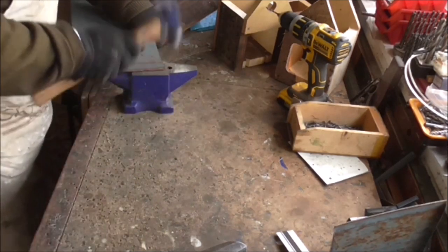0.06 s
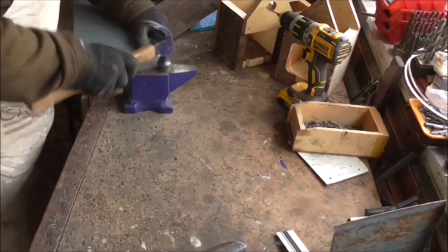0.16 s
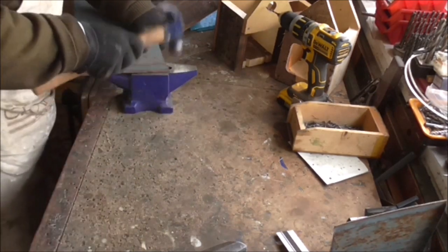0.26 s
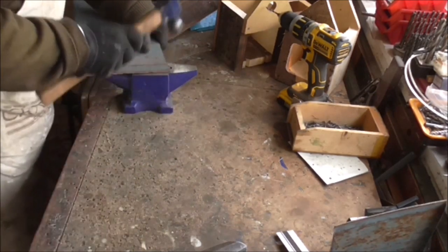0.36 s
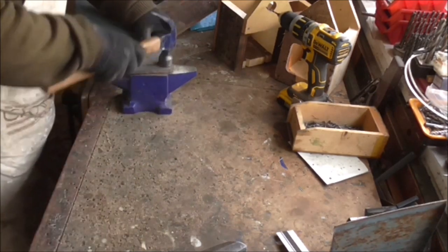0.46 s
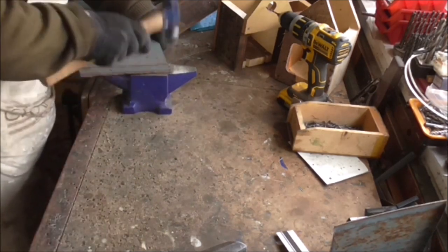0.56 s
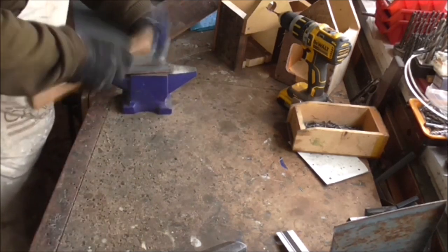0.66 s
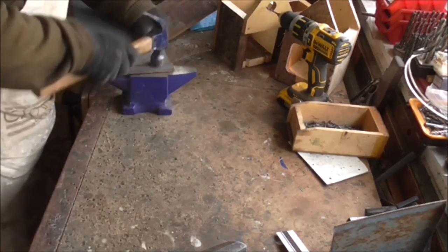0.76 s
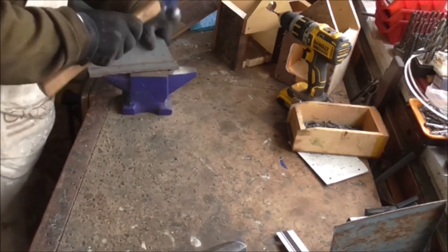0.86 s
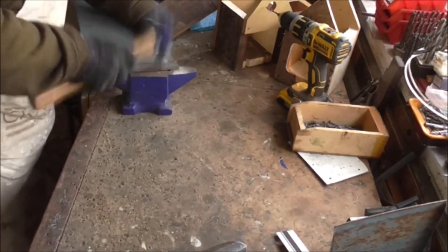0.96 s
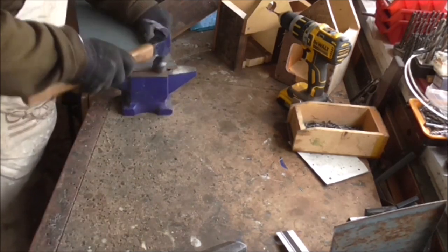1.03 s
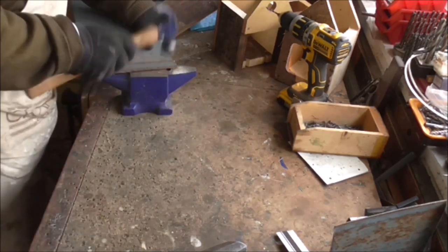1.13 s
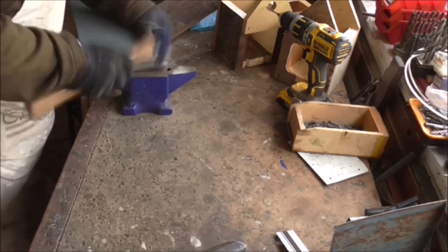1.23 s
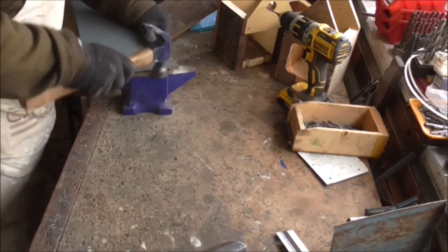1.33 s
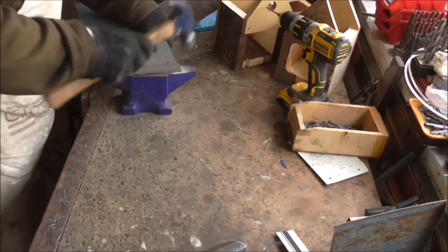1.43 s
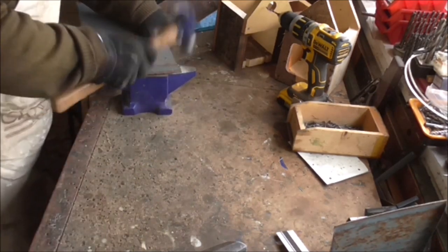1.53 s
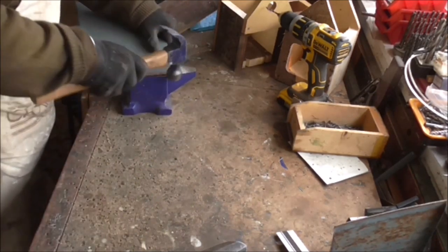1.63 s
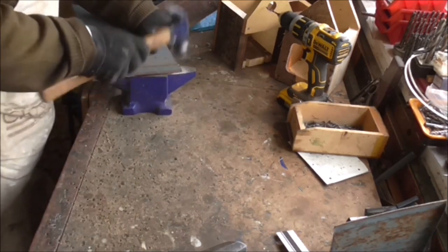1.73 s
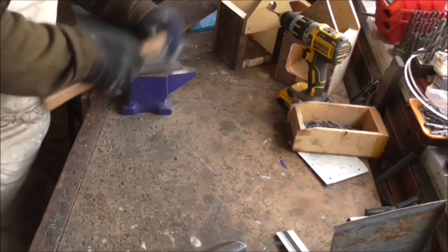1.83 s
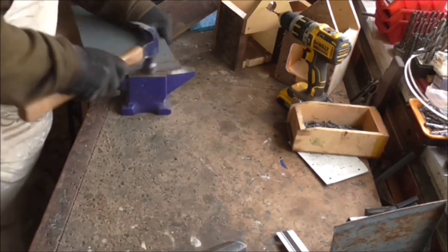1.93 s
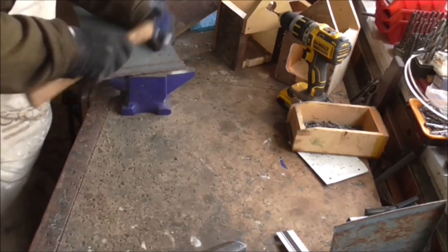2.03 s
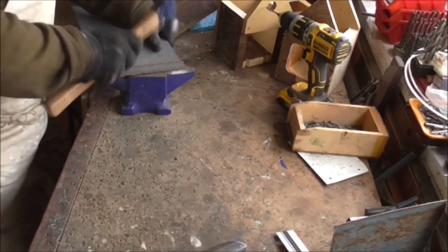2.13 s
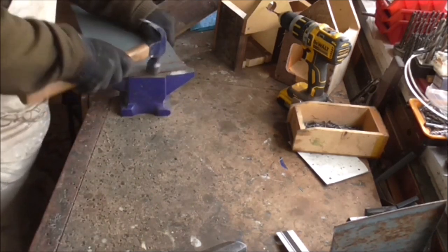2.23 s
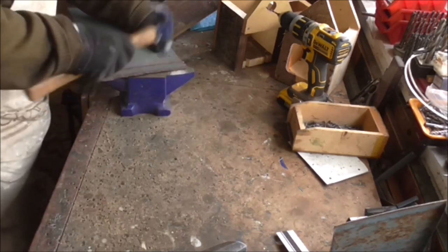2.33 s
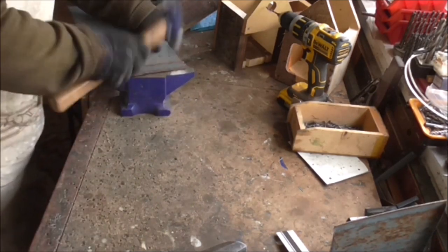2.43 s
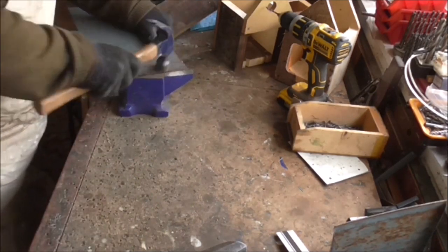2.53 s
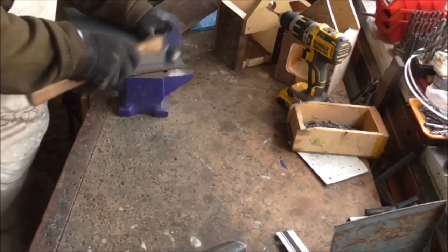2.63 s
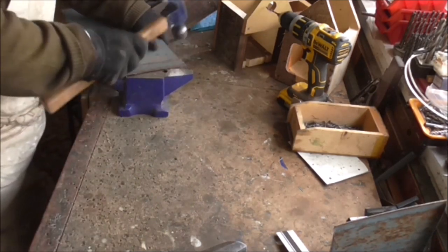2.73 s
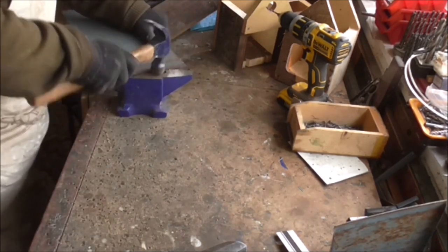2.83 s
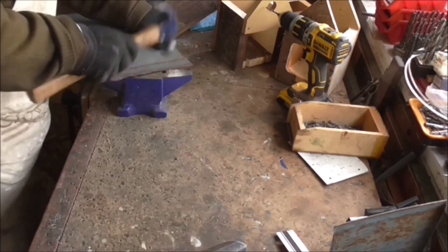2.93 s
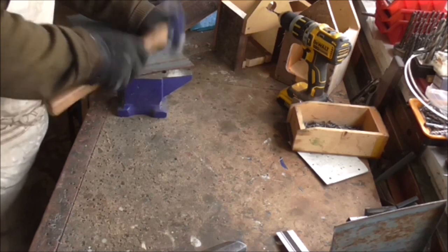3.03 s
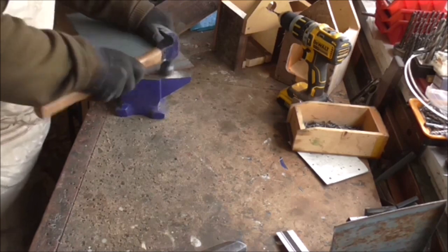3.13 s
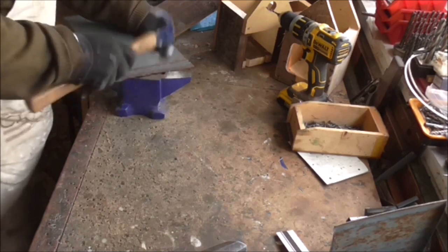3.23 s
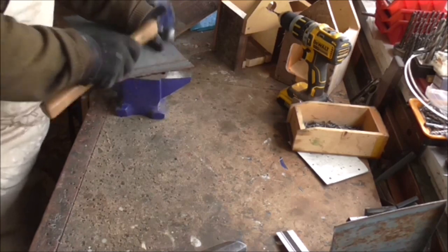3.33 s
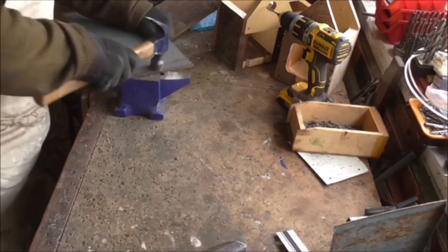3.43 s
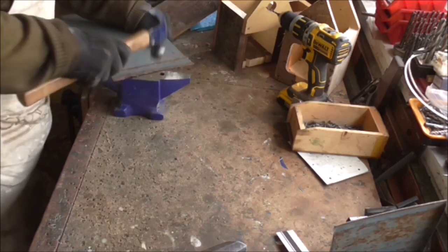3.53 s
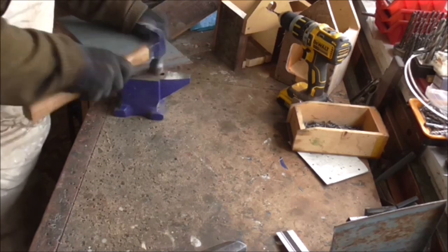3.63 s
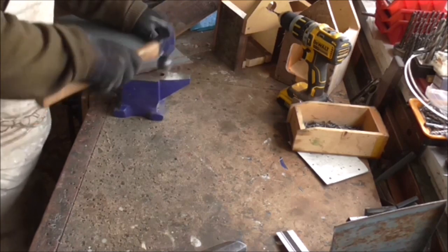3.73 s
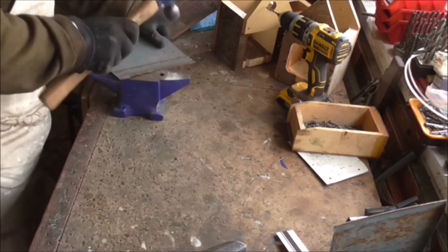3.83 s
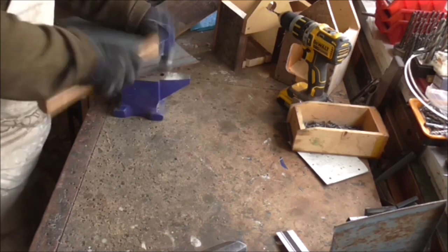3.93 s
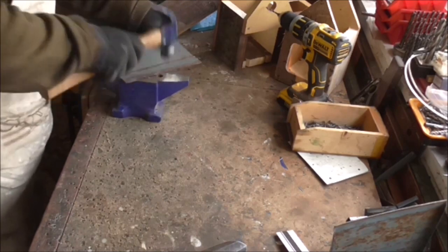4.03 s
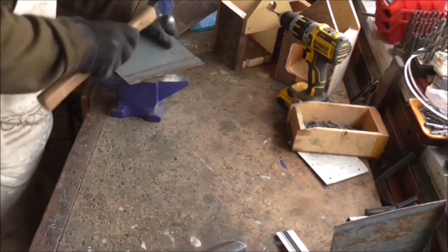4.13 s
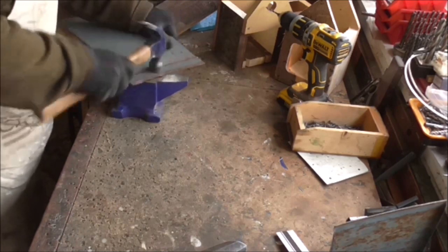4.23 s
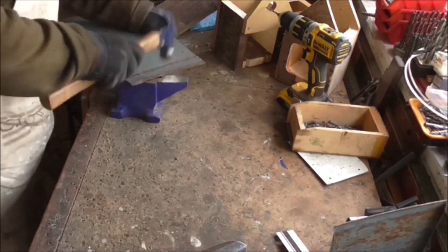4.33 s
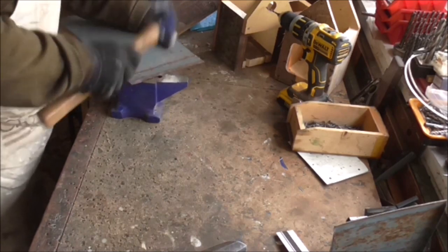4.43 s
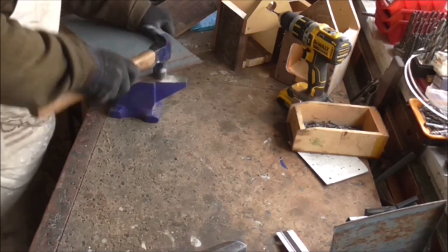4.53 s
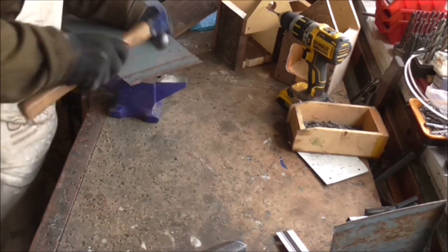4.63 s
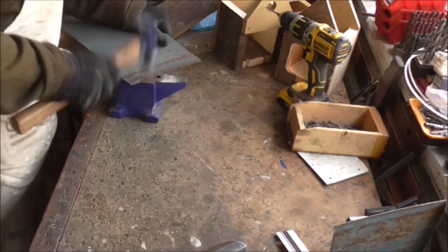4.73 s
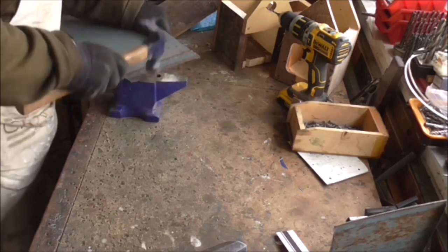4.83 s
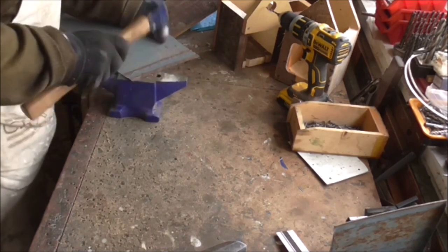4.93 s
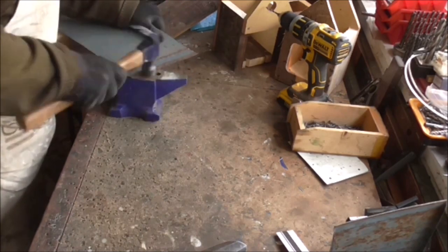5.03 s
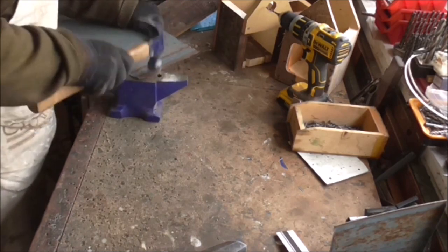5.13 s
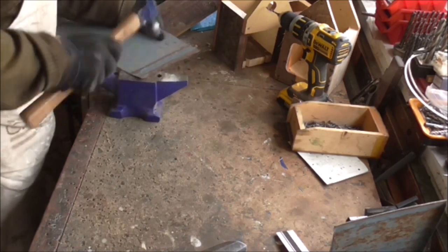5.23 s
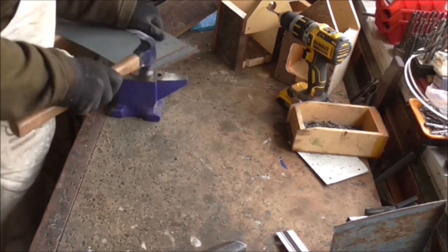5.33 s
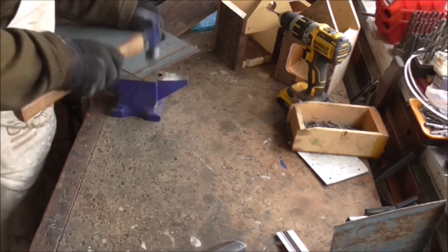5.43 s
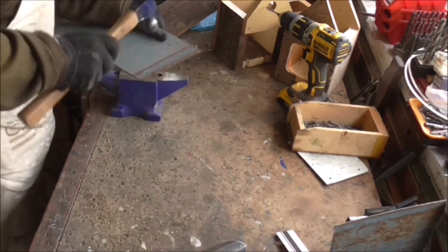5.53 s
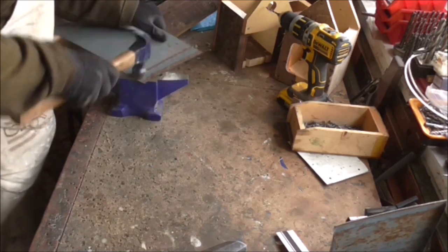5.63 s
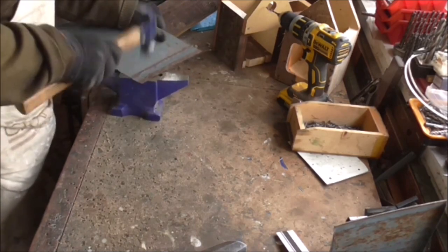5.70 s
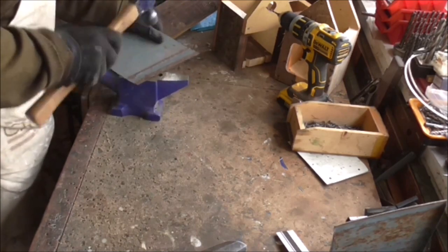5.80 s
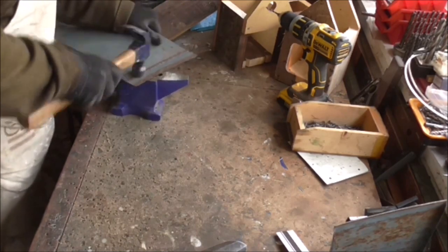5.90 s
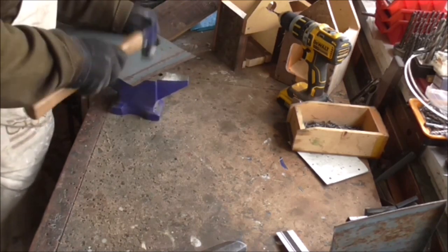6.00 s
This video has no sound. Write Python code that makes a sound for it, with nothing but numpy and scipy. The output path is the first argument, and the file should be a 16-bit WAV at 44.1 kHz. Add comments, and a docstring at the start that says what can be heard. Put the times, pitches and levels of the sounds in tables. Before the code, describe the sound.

A hammer strikes sheet metal on a small anvil in steady, sharp, briefly ringing blows in a small workshop.

```python
"""Sharp, ringing hammer blows, between three and four a second, sound in a small workshop.
A claw hammer is flattening a steel sheet, held in a gloved hand, on a small anvil on a wooden bench.
Each blow cracks, rings the steel briefly and thumps the bench; the room echoes.
Between some blows the hand shifts the sheet with a faint scrape.
A limiter, an automatic volume control, holds the blows at much the same level."""
import sys
import numpy as np
from scipy import signal
from scipy.fft import rfft, irfft, next_fast_len
from scipy.io import wavfile
from scipy.ndimage import uniform_filter1d, minimum_filter1d

SR = 44100
rng = np.random.default_rng(int(sys.argv[2]) if len(sys.argv) > 2 else 0)


def int16_out(signal):
    """Quantize to a 16-bit WAV file."""
    q = np.round(np.clip(np.atleast_2d(signal).T, -1, 1) * 32767)
    wavfile.write(sys.argv[1], SR, q.astype(np.int16))


N = 267378
T = np.arange(SR // 2) / SR  # seconds within one blow or scrape

# The hammer blows; how squarely the face lands decides the two rings.
# Each row: time in seconds, strength in dB, anvil ring in dB, hammer head ring in dB.
BLOW_EVENTS = [(-0.088, -10, -28.5, -47), (0.213, -11.5, -31, -41), (0.509, -9.5, -27.5, -29),
               (0.795, -8, -30, -32), (1.076, -9.5, -28.5, -39.5), (1.354, -10, -28.5, -34),
               (1.653, -11.5, -38.5, -28.5), (1.961, -10.5, -30.5, -38), (2.267, -10, -35.5, -30.5),
               (2.568, -10, -34.5, -33.5), (2.882, -13, -31.5, -44), (3.17, -11.5, -35, -31.5),
               (3.464, -12.5, -31, -37), (3.747, -14.5, -38, -38), (4.033, -10.5, -32.5, -26.5),
               (4.307, -11.5, -28, -46), (4.581, -11.5, -35.5, -40.5), (4.843, -14, -40, -38),
               (5.129, -10, -32, -26.5), (5.406, -12.5, -40.5, -31.5), (5.695, -11, -30.5, -28.5),
               (5.981, -10.5, -32.5, -31)]
# The hand shifts the sheet. Each row: start in seconds, scrape level in dB, length in seconds.
SHEET_SHIFTS = [(0.362, -70, 0.093), (1.593, -70, 0.069), (1.897, -67, 0.18), (2.086, -50, 0.06),
                (2.683, -66.5, 0.042), (3.073, -70.5, 0.045), (3.901, -77, 0.22), (4.972, -67, .06)]
# The sheet is fed across the anvil. Each row: time in seconds, pitch of the struck spot in Hz.
SPOT_PITCH = [(0, 4885), (2, 4870), (4.55, 4862), (4.85, 4925), (6, 4935)]
# The further the sheet sticks out, the looser it sounds.
# Each row: time in seconds, ring of the free end in dB, clank in dB (both added to the blow's strength).
SHEET_LOOSENESS = [(0, -39, -22), (1.96, -33, -19.5), (3.17, -25.5, -17.5), (4.4, -23, -16.5),
                   (5.13, -29.5, -22.5), (6, -26, -21.5)]

# Modes are the tones a struck thing rings with.
# Each row: pitch in Hz, relative level in dB, seconds to fade by 60 dB (called t60).
ANVIL_MODES = [(3887, -.5, .14), (4282, 2, .125), (5870, -8.5, .11), (6100, -10, .08), (7069, -17, .12),
               (8620, -21, .1)]
HAMMER_MODES = [(5472, 0, .12), (7890, -6, .085)]
SHEET_MODES = [(4880, 0, .14), (4945, -4, .14), (4825, -5, .13), (4745, -5.5, .12), (4640, -5, .1),
               (5150, -12, .06)]  # around the struck spot, strongest first
OVERHANG_MODES = [(676, 1, 0.27), (606, -2, 0.29), (687, -3, 0.15)]  # the sheet's free end bending
BENCH_MODES = [(116, -13, 0.42), (182, -4, 0.11), (206, -2, 0.18), (218.7, 2.5, 0.24), (281.3, -1.5, 0.33),
               (413, -6, 0.17), (490, -9.5, 0.084), (549.5, 1.5, 0.16), (1135, -8, 0.29), (1583, -3, 0.13),
               (1706, 2, 0.087)]

# The tone colour of each noise. Each row: frequency in Hz, relative level in dB.
AIR_SPECTRUM = [(15, -53), (25, -5.5), (236, 1), (285, 0), (463, -0.5), (734, -14.5), (840, -8),
                (3160, -15.5), (3820, -23.5), (4870, -14), (6380, -20), (13600, -33.5), (16000, -63)]
ECHO_SPECTRUM = [(100, -3.5), (400, 7.5), (1500, -0.5), (4500, -0.5), (9000, 4), (15000, -2.5)]
SCRAPE_SPECTRUM = [(100, -7.5), (300, -1.5), (700, 5.5), (1100, -1.5), (1900, 0.5), (3200, -15.5),
                   (4900, -5), (8000, -17.5), (15000, -36)]
THUMP_SPECTRUM = [(25, -28), (55, -16.5), (85, -12.5), (120, -5.5), (180, -3), (240, -3.5), (330, -4.5),
                  (700, -17), (2000, -45.5)]
CLANK_SPECTRUM = [(100, -23.5), (250, -5.5), (450, -1), (680, 2.5), (900, -3), (1700, -8), (3000, -17),
                  (6000, -41)]
SIZZLE_SPECTRUM = [(1000, -14), (3500, -3), (3880, 9.5), (4080, 4.5), (4290, 11), (4470, 5), (4850, 14),
                   (5250, 4.5), (5480, 9), (6000, 4.5), (6700, -1), (9500, -8), (12500, -9.5), (15400, -7),
                   (16200, -23.5)]
CRACK_SPECTRUM = [(100, -18), (400, -3), (1300, 4.5), (2000, 1), (2700, 5), (3500, -3), (4900, 9),
                  (6500, -3), (9000, -5.5), (14000, -2.5), (15500, -7), (16200, -23)]

# How long the workshop echoes. Each row: frequency in Hz, seconds to fade by 60 dB.
ECHO_T60 = [(100, 0.35), (400, 0.1734), (750, 0.29), (1200, 0.3), (2900, 0.2569), (5000, 0.2545),
            (9000, 0.2263), (12000, 0.2), (16000, 0.09)]
# How alike scattered sound is left and right. Each row: frequency in Hz, likeness (1 means the same).
STEREO_LIKENESS = [(30, .05), (100, .6), (300, .4), (700, .5), (1300, .25), (3000, .5), (4700, .72),
                   (8000, .35), (15000, .3)]


def amp(db):
    """Turn decibels into a number to multiply by."""
    return 10 ** (np.asarray(db) / 20)


def unit(x):
    """Scale a sound to an average level (rms) of 1."""
    return x / np.sqrt(np.mean(x ** 2) + 1e-20)


def unit_ring(x, seconds=0.026):
    """Give a whole ring the energy of a level-1 sound lasting this many seconds."""
    return x / np.sqrt(np.sum(x ** 2) / (len(x) * seconds * SR))


def at_hz(table, hz):
    """Read a table between its frequencies, with octaves evenly spaced."""
    frequencies, values = np.transpose(table)
    return np.interp(np.log(hz + 1), np.log(frequencies), values)


def at_time(table, s):
    """Read a table's values at s seconds."""
    times, *columns = np.transpose(table)
    return [np.interp(s, times, column) for column in columns]


def add(track, s, sound):
    """Mix a stereo sound into the track at s seconds."""
    start = round(s * SR)
    part = sound[:, max(-start, 0):max(N - start, 0)]
    track[:, max(start, 0):][:, :part.shape[1]] += part


def noise(spectrum, size=len(T), spread=1):
    """Stereo noise with a given tone colour; a small spread draws it to the centre."""
    hz = np.fft.rfftfreq(size, 1 / SR)
    angle = spread * np.arccos(np.clip(at_hz(STEREO_LIKENESS, hz), -1, 1)) / 2
    coloured = rfft(rng.standard_normal((2, size))) * amp(at_hz(spectrum, hz))
    mid, side = irfft(coloured * [np.cos(angle), np.sin(angle)], size)
    return unit(np.array([mid + side, mid - side]))


def fade(t60, rise):
    """The level of a struck thing: a quick rise, then a steady fall. Both times are in seconds."""
    return np.exp(-np.log(1000) * T / t60) * (1 - np.exp(-T / rise))


def ring(modes, scatter_db, detune, rise, width, stretch=1, linger=0):
    """Tones started by one blow; their level and tuning vary, as no two blows hit the same spot."""
    sound = np.zeros((2, len(T)))
    for hz, db, t60 in modes:
        level_luck, pitch_luck, phase_luck = rng.standard_normal(3)
        pitch = hz * stretch * (1 + detune * pitch_luck)
        phase = width * phase_luck * np.array([[1], [-1]])  # left and right are out of step
        envelope = fade(t60, rise) + linger * fade(2.8 * t60, rise)  # linger adds a longer tail
        sound += amp(db + scatter_db * level_luck) * envelope * np.sin(2 * np.pi * pitch * T + phase)
    return sound


def workshop(sound, echo_db, build_s):
    """Add the echo from bench top, clutter and walls; the highest treble dies first."""
    hz, t, bands = signal.stft(noise(ECHO_SPECTRUM), SR, nperseg=256)
    decay = np.exp(-np.log(1000) * t / at_hz(ECHO_T60, hz)[:, None])
    tail = signal.istft(bands * decay, SR, nperseg=256)[1][:, :len(T)]
    tail *= 1 - np.exp(-(T / build_s) ** 2)
    echo = signal.fftconvolve(sound.mean(0)[None], tail, axes=1)[:, :len(T)]
    return sound + amp(echo_db) * np.std(sound) * unit(echo)


def still_air():
    """The faint, steady hush of the workshop."""
    return amp(-74) * noise(AIR_SPECTRUM, next_fast_len(N))[:, :N]


def sliding():
    """Short gritty scrapes as the hand moves the sheet, whose edge hisses."""
    track = np.zeros((2, N))
    for s, scrape_db, length in SHEET_SHIFTS:
        stroke = np.sin(np.pi * np.minimum(T / length, 1))
        roughness = unit(uniform_filter1d(rng.standard_normal(len(T)), size=120))
        grit = unit(amp(2 * roughness))
        scrape = amp(scrape_db) * noise(SCRAPE_SPECTRUM)
        edge_hiss = amp(-72) * noise(SIZZLE_SPECTRUM)
        add(track, s, workshop(stroke * grit * (scrape + edge_hiss), echo_db=-8, build_s=0.005))
    return track


def clank_and_thump(overhang_db, clank_db):
    """A blow's dull part: the held sheet clanks, its free end rings hollow, the bench swings after."""
    clank = amp(clank_db) * fade(t60=0.23, rise=0.00015) * noise(CLANK_SPECTRUM)
    hollow = amp(overhang_db) * ring(OVERHANG_MODES, scatter_db=2.5, detune=.0064, rise=.0022, width=.4)
    thump = amp(-23.5) * fade(t60=0.26, rise=0.0037) * noise(THUMP_SPECTRUM)
    boards = amp(-27.5) * ring(BENCH_MODES, scatter_db=1, detune=.0066, rise=.0025, width=.13)
    lean_right = amp([[-.8], [.8]])
    return workshop(clank + hollow + thump + boards, echo_db=-13, build_s=0.033) * lean_right


def steel_ring(hammer_db, anvil_db, sheet_db, sheet_hz):
    """Anvil, hammer head and sheet ring clearly; anvil and head sing on faintly afterwards."""
    linger = amp(-24.5)
    anvil = ring(ANVIL_MODES, scatter_db=.5, detune=.0015, rise=.002, width=.15, linger=linger)
    head = ring(HAMMER_MODES, scatter_db=.5, detune=.0015, rise=.001, width=.1, linger=linger)
    stretch = sheet_hz / SHEET_MODES[0][0]
    sheet = ring(SHEET_MODES, scatter_db=.5, detune=.003, rise=.0007, width=.15, stretch=stretch)
    tools = amp(anvil_db) * unit_ring(anvil) + amp(hammer_db) * unit_ring(head)
    return (workshop(tools, echo_db=-17, build_s=0.031)
            + workshop(amp(sheet_db) * sheet, echo_db=-17, build_s=0.029))


def lead_in(swell_s):
    """A very short burst of bright noise swells into each blow's crack."""
    swell = np.minimum(T / swell_s, 1) ** 2
    cutoff = np.exp(-np.maximum(T - swell_s, 0) / 0.00045)
    return amp(-18) * swell * cutoff * noise(CRACK_SPECTRUM, spread=0.53)


def contact():
    """Steel cracks on steel, and the sheet's many high tones sizzle briefly."""
    crack = amp(-3) * fade(t60=0.012, rise=0.0001) * noise(CRACK_SPECTRUM, spread=0.082)
    sizzle = amp(-6.5) * fade(t60=0.09, rise=0.0023) * noise(SIZZLE_SPECTRUM)
    return workshop(crack + sizzle, echo_db=-10, build_s=0.0028)


def hammering(swell_s, lead_s):
    """Each blow's lead-in starts lead_s early and swells for swell_s; then steel and bench sound."""
    track = np.zeros((2, N))
    for s, db, anvil_db, hammer_db in BLOW_EVENTS:
        overhang_db, clank_db = at_time(SHEET_LOOSENESS, s)
        sheet_hz = at_time(SPOT_PITCH, s)[0]
        impact = amp(db) * (contact() + clank_and_thump(overhang_db, clank_db))
        ringing = steel_ring(hammer_db, anvil_db, sheet_db=db - 11.5, sheet_hz=sheet_hz)
        add(track, s - lead_s, amp(db) * lead_in(swell_s))
        add(track, s - lead_s + swell_s, impact + ringing)
    return track


def scene():
    """Hammering and sliding over the still air of the workshop."""
    return hammering(swell_s=0.004, lead_s=0.0018) + sliding() + still_air()


def limiter(x, ceiling, attack_s):
    """Turn loud peaks down a moment late: the first crack slips through, the ring is held level."""
    needed_gain = ceiling / np.maximum(np.abs(x).max(0), ceiling)
    held_gain = minimum_filter1d(needed_gain, size=161, origin=60)
    smoothing = np.exp(-1 / (attack_s * SR))
    reduction = signal.lfilter([1 - smoothing], [1, -smoothing], 1 - held_gain)
    return x * (1 - reduction)


def record(dry):
    """Limit the blows, round off the peaks that slip through and cut the very highest treble."""
    peak_level, top_hz = 0.4, 16300
    limited = limiter(dry, ceiling=0.33, attack_s=0.0012)
    rounded = limited / (1 + (limited / peak_level) ** 4) ** .25
    size = next_fast_len(N + SR // 2)
    hz = np.fft.rfftfreq(size, 1 / SR)
    treble_cut = np.clip((top_hz - hz) / 300 + 1, 0, 1)
    return irfft(rfft(rounded, size) * treble_cut, size)[:, :N]


dry = scene()
out = record(dry)
int16_out(out)
```